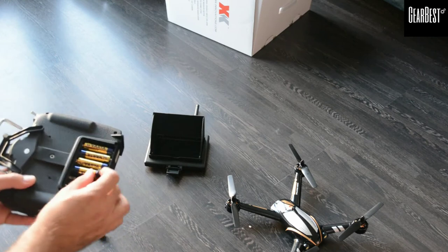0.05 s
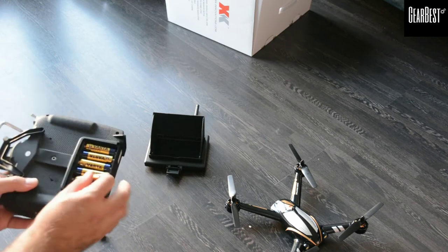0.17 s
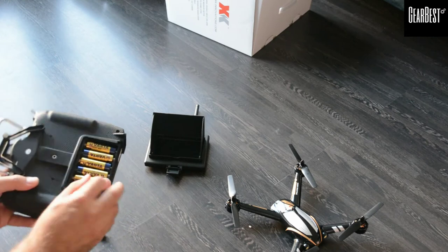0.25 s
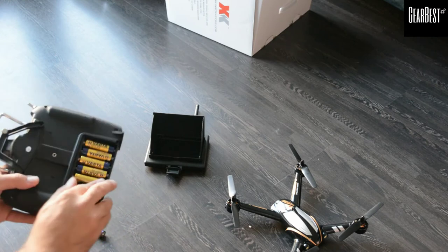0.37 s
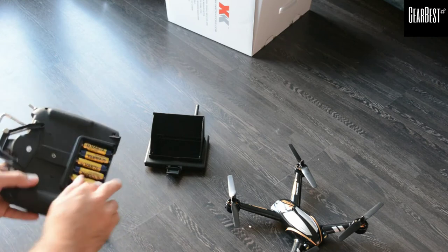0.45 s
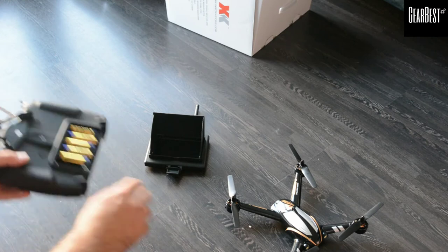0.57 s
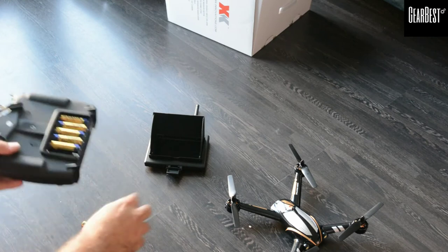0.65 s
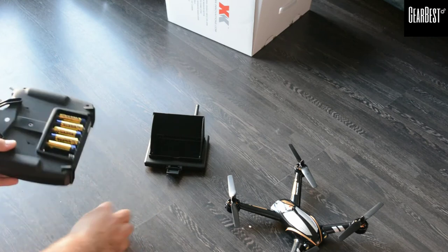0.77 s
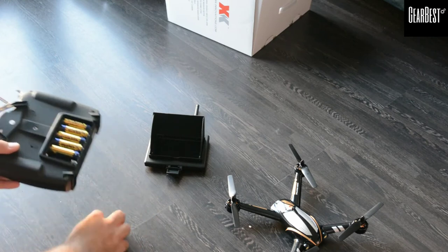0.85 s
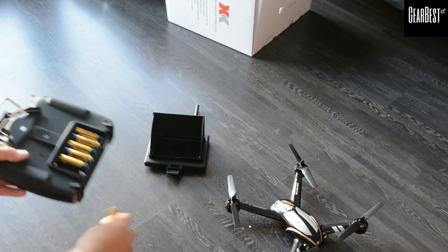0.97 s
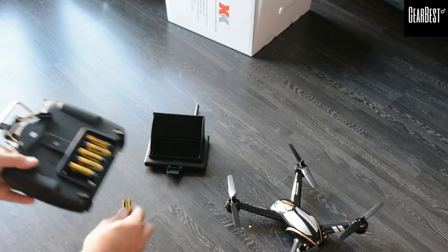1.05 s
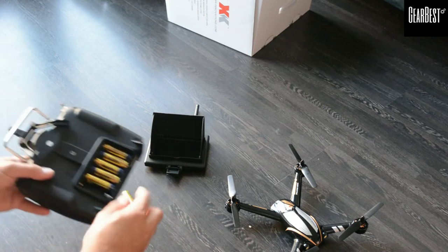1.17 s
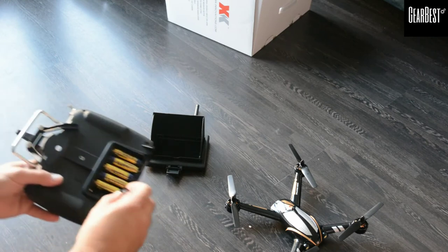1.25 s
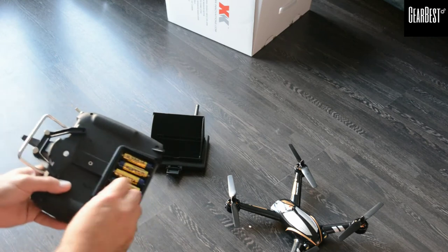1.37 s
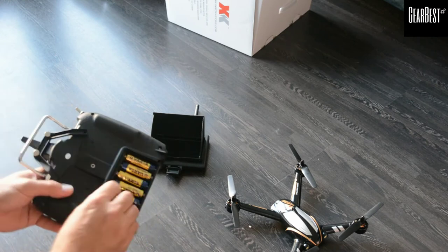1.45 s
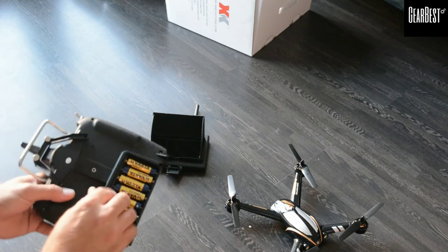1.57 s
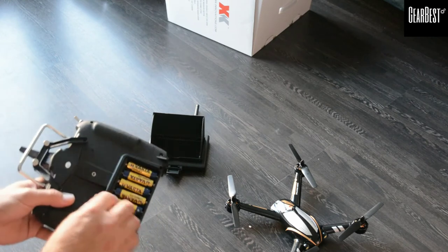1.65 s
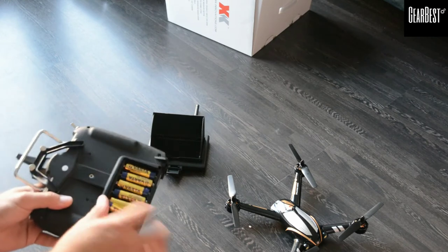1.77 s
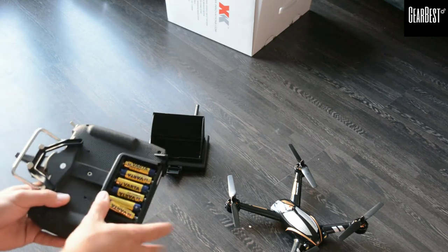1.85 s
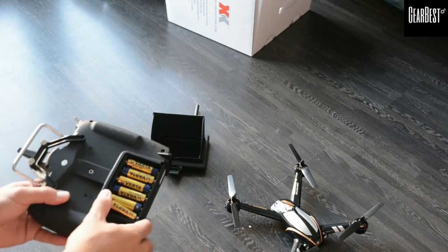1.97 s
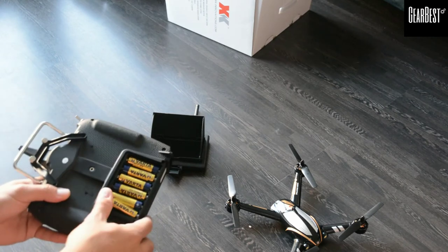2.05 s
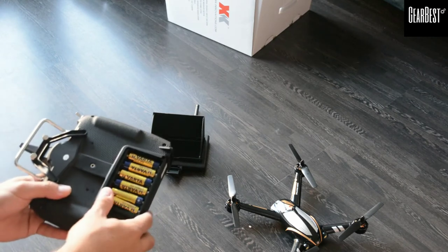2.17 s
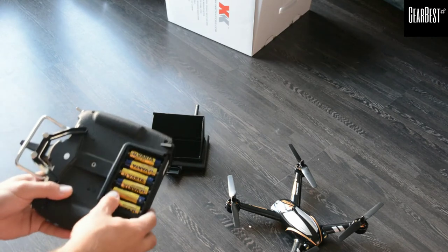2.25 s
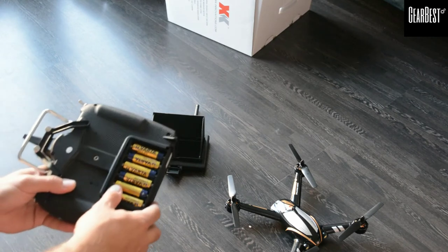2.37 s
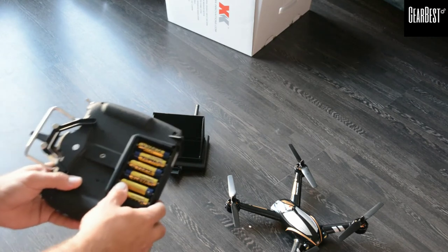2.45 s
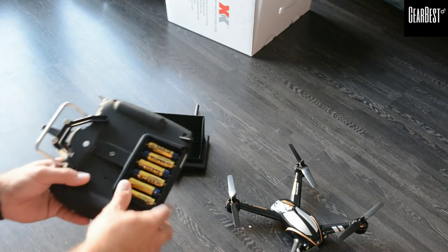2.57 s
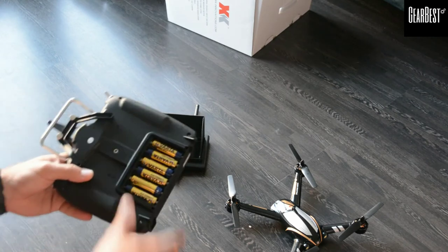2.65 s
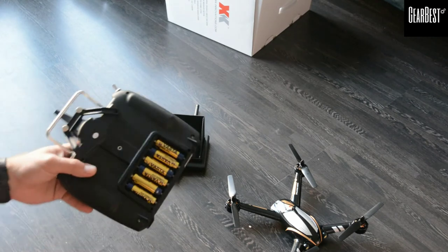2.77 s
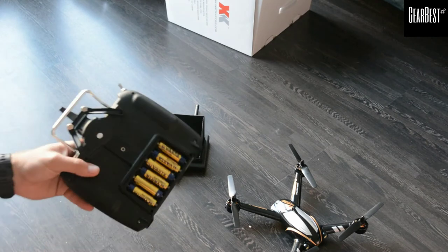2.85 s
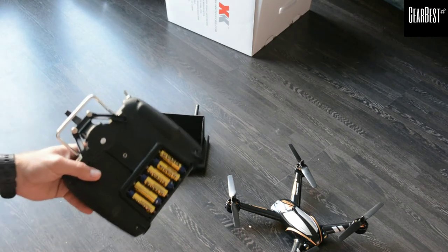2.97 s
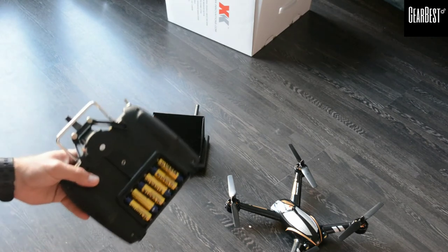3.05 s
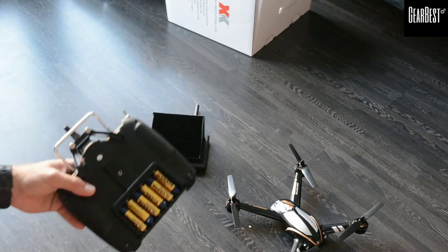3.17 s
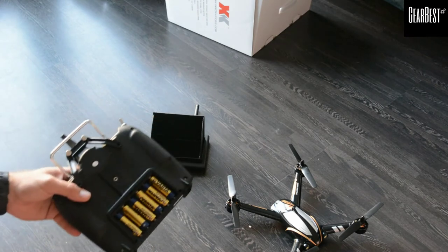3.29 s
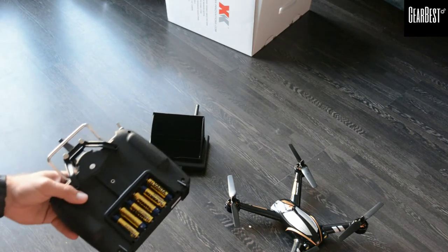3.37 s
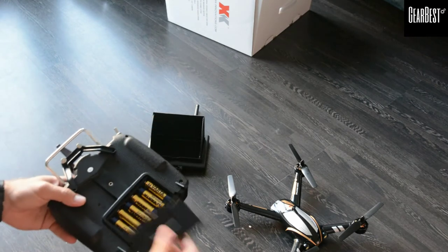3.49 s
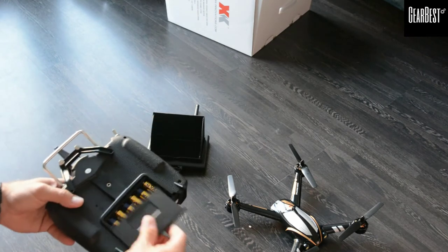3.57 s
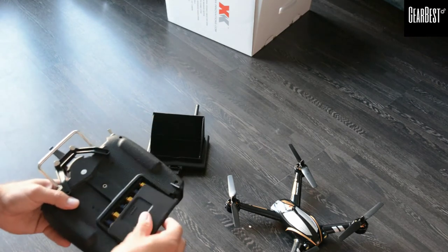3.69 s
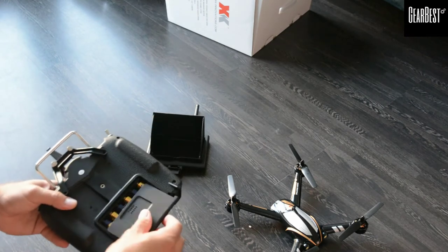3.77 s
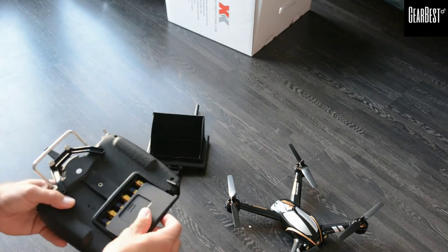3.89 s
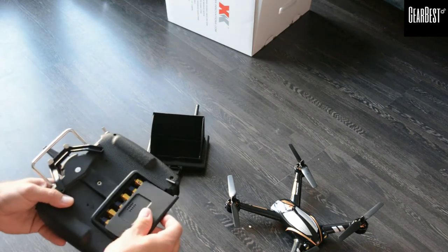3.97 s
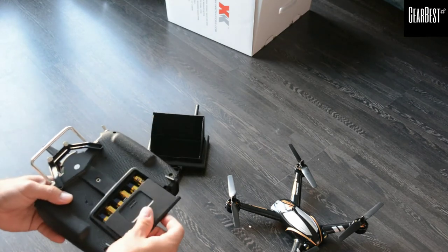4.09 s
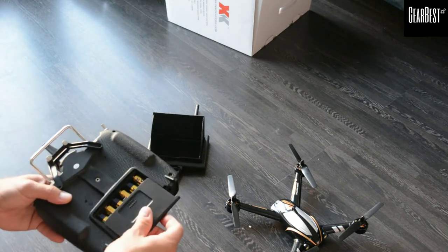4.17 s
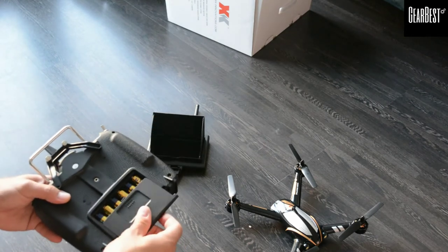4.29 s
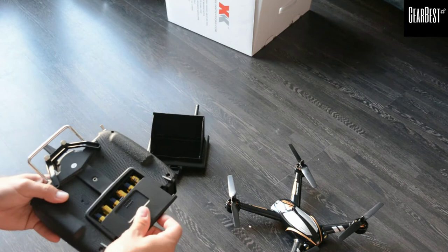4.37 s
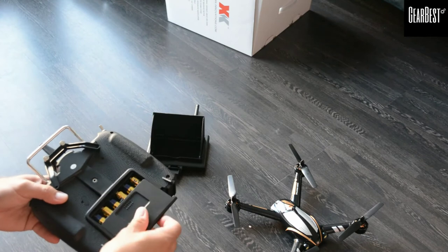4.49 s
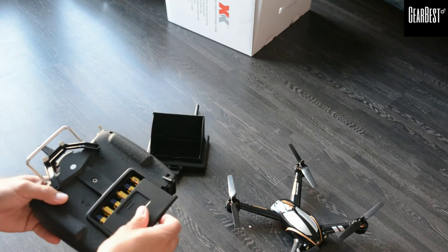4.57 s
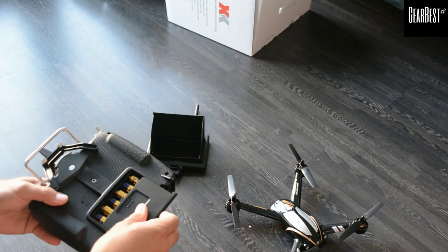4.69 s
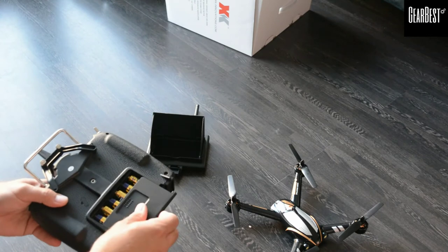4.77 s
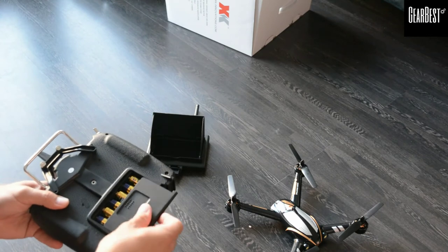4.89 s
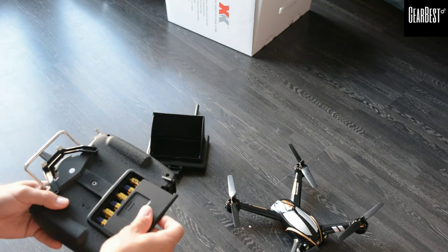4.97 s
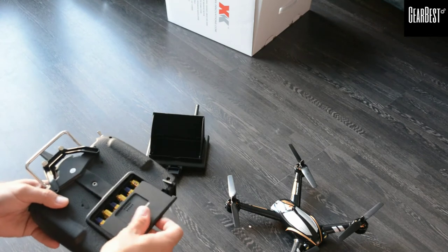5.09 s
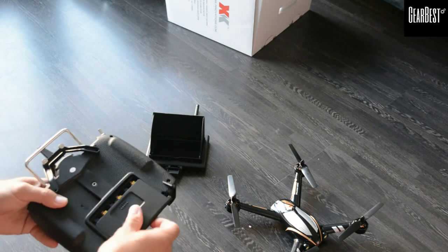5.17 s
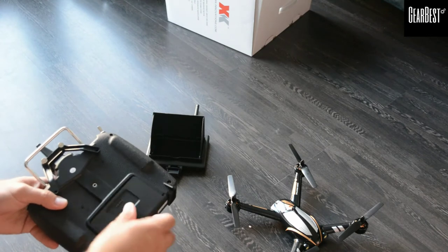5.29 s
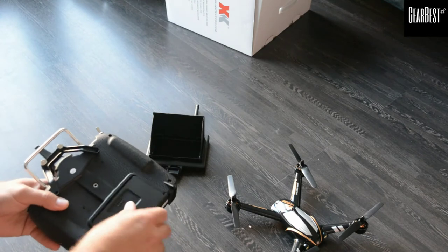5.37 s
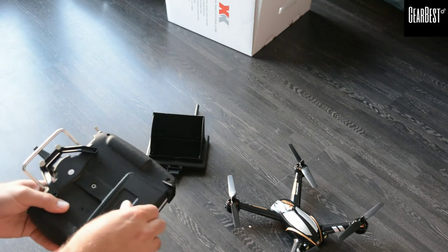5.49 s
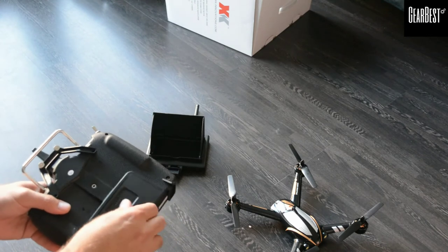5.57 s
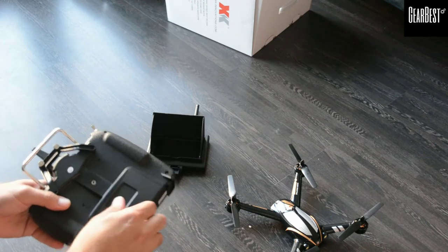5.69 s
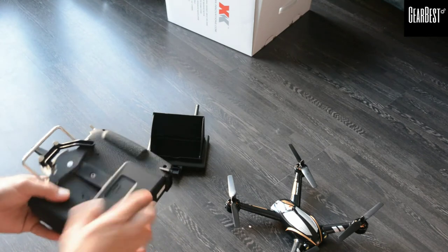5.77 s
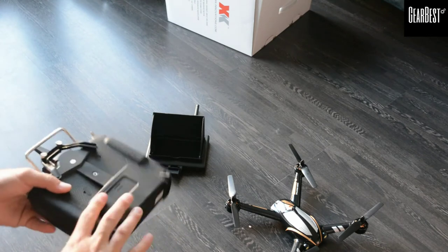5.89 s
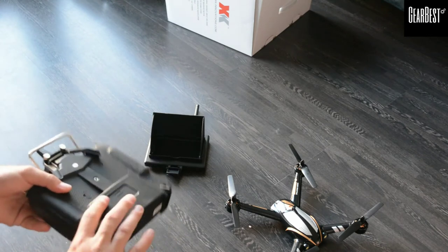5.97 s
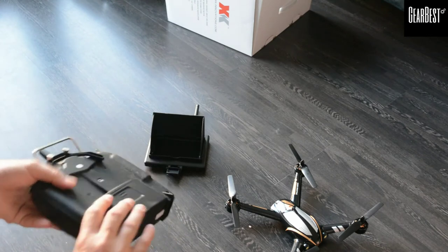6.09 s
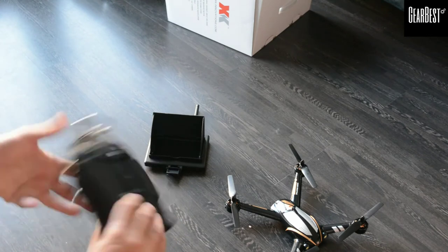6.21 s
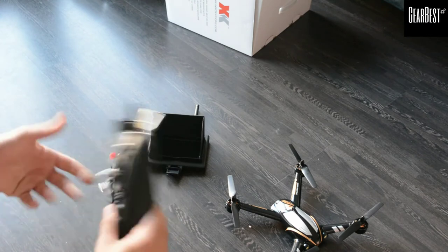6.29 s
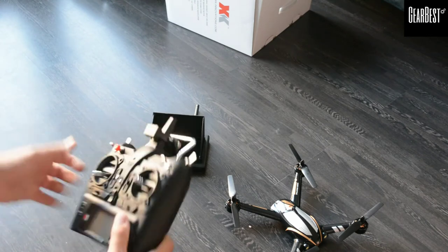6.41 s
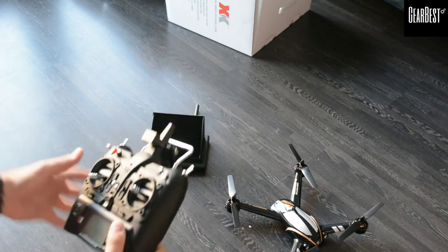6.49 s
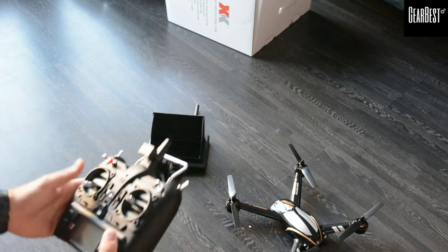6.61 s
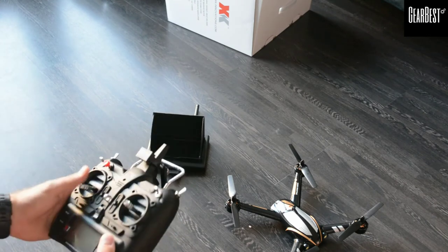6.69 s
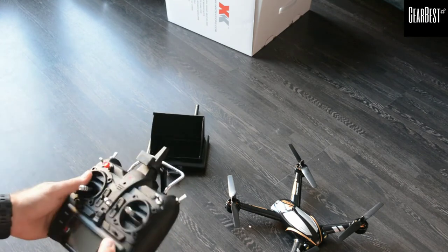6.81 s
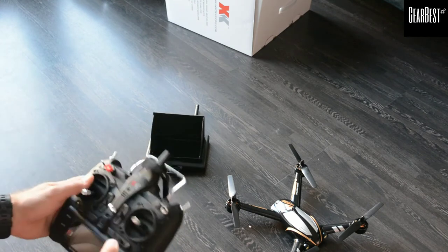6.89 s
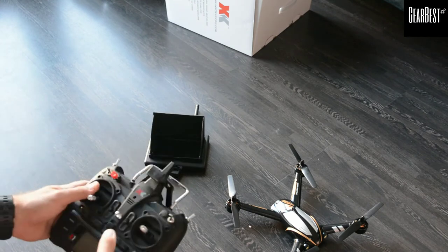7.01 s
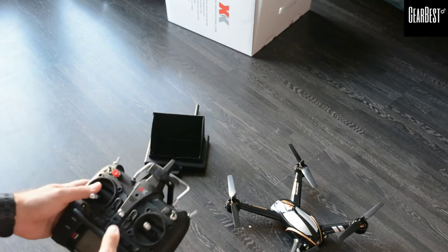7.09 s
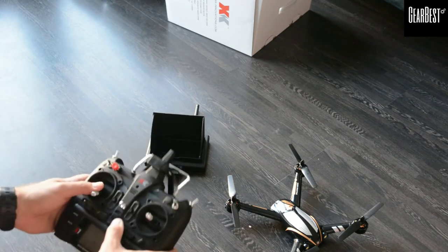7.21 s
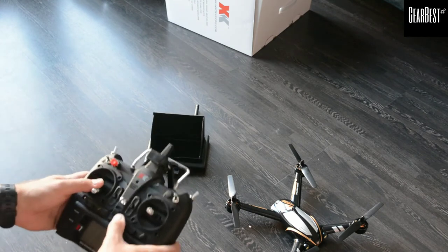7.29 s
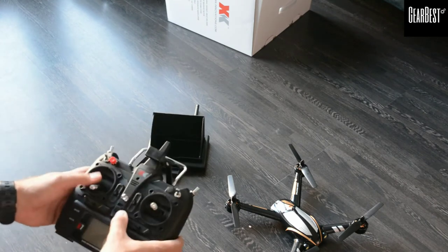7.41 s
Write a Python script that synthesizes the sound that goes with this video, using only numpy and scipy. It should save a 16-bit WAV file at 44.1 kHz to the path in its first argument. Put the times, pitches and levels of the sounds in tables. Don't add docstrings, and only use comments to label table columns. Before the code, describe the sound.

Sharp plastic snaps come in uneven bursts as cells seat against springs, the hardest ones distorting at the close stereo microphones. Then comes a brief lull, a bright clack as a cover is laid on, small scrapes and ticks, and a firm latch. Finally only faint touches and one light knock remain. The room is bare and reverberant, with a quiet steady room tone underneath.

```python
import sys
import numpy as np
from scipy import signal
from scipy.fft import rfft, irfft
from scipy.io import wavfile

SR = 44100
rng = np.random.default_rng(int(sys.argv[2]) if len(sys.argv) > 2 else 0)


def gain_from_decibels(decibels):
    exponent = np.asarray(decibels, float) / 20
    return 10 ** exponent


def transcribe(u):
    v = np.clip(np.atleast_2d(u).T, -1, 1)
    q = np.round(v * 32767).astype(np.int16)
    wavfile.write(sys.argv[1], SR, q)


N = 328525

# pitch in Hz, level in dB, time to fall 60 dB in seconds.
SHELL_MODES = [(308.6, -7, 0.043), (400, -4.5, 0.006), (490, -3, 0.014), (573.5, -2, 0.027),
               (784, -10, 0.033), (1000, 1.5, 0.016), (1169, 1, 0.021), (1350, -3.5, 0.021),
               (1560, 4.5, 0.012), (1850, -1.5, 0.012), (2125, 8, 0.0063), (2546, -5.5, 0.0094),
               (2700, 0.5, 0.0081), (3130, 13, 0.0038), (3790, -5, 0.015), (4200, 6.5, .004),
               (5076, 8, 0.0023), (6370, -3.5, 0.0031), (6670, 13.5, 0.0015), (8550, 0.5, 0.00345),
               (9660, 16, 0.0011), (11930, -8.5, 0.0036), (13950, -12, 0.00099)]
SMALL_BODY_HZ = 248


def at_hz(points, hz, axis=1):
    points = np.array(points)
    return np.interp(np.log(hz), np.log(points[:, 0]), points[:, axis])


def bands(size):
    edges_hz = 22 * 2 ** np.arange(0, 9.7, 1 / 3)
    white = rng.standard_normal((2, 2, size))
    for k, (low, high) in enumerate(zip(edges_hz, edges_hz[1:])):
        band_filter = signal.butter(2, [low, high], "band", fs=SR, output="sos")
        yield np.sqrt(low * high), signal.sosfilt(band_filter, white[k % 2])


def add(track, s, sound):
    i = round(s * SR)
    track[i:i + len(sound)] += sound[:N - i]


def air():
    # frequency in Hz, level in dB per Hz.
    air_colour = [(15, -52), (25, -28), (80, -11.5), (161, -9.5), (190, -5.5), (394, -6.5), (560, -6.5),
                  (775, -4), (1160, -9.5), (1840, -10), (16000, -38)]
    # frequency in Hz, side minus mid in dB.
    air_width = [(60, -13.5), (180, -13), (550, -6.5), (1650, -4.5), (4970, -1.5), (15000, -1.5)]
    tone = np.zeros((2, N))
    for hz, noise in bands(N):
        side_db = np.array([[0], [at_hz(air_width, hz)]])
        tone += gain_from_decibels(at_hz(air_colour, hz) + side_db) * noise
    return gain_from_decibels(-55) * tone / np.std(tone[0])


def room(x):
    # frequency in Hz, time to fall 60 dB in seconds, level in dB.
    room_tail = [(151, 0.408, -52), (400, 0.58, -29.5), (1040, 0.65, -32.5), (2700, 0.65, -31),
                 (7500, 0.54, -26), (14340, .3, -31.5)]
    # frequency in Hz, side minus mid in dB.
    tail_width = [(60, -26), (150, -21), (380, -40), (950, -32.5), (2380, -18), (5980, -14), (15000, -2.5)]
    direct_db, floor_echo_s, floor_echo_db = 2.5, 0.0055, -8
    early_db, early_t60_s = 5.5, 0.068
    t = np.arange(SR) / SR
    swell = 1 - np.exp(-np.clip(t - .003, 0, 1) / 0.0034)
    reply = np.zeros((2, SR))
    for hz, noise in bands(SR):
        side_db = np.array([[0], [at_hz(tail_width, hz)]])
        gains = gain_from_decibels(at_hz(room_tail, hz, axis=2) + side_db)
        late_fade = gain_from_decibels(-60 * t / at_hz(room_tail, hz))
        early_fade = gain_from_decibels(early_db - 60 * t / early_t60_s)
        reply += gains * noise * swell * (late_fade + early_fade)
    early = np.zeros(SR)
    early[[0, round(floor_echo_s * SR)]] = gain_from_decibels([direct_db, floor_echo_db])
    reply[0] += early
    reply[1] += gain_from_decibels(-10.5) * signal.lfilter(*signal.butter(1, 9000, "high", fs=SR), early)
    return signal.fftconvolve(x[None], reply, axes=1)[:, :N]


def damped(hz, t60):
    t = np.arange(SR // 12) / SR
    fade = gain_from_decibels(-60 * np.outer(1 / np.array(t60), t))
    return np.sin(2 * np.pi * np.outer(hz, t)) * fade


def shell_ring(colour_hz, levels_db, luck, size=4096):
    hz, mode_db, t60 = np.transpose(SHELL_MODES)
    colour_db = np.interp(np.log(hz), np.log(colour_hz), levels_db)
    spread_db = 3.5
    modes = gain_from_decibels(colour_db + mode_db + spread_db * luck)[:, None] * damped(hz, t60)
    power = np.sum(np.abs(rfft(modes, size)) ** 2, axis=0)
    cepstrum = irfft(np.log(power + 1e-12) / 2)
    cepstrum[1:size // 2] *= 2
    cepstrum[size // 2 + 1:] = 0
    return irfft(np.exp(rfft(cepstrum)))[:size // 2]


def chatter(blow):
    for delay_s in (.00017, .00045, .0011):
        lag = round(delay_s * rng.uniform(.6, 1.4) * SR)
        taps = np.zeros(lag + 1)
        taps[[0, lag]] = .68, 1
        blow = signal.lfilter(taps, taps[::-1], blow)
    return blow


def rattles(count=40):
    # start in seconds, shell level in dB, length in seconds, boom and tick in dB against the shell.
    rubs = [(0.061, -11.5, 0.04, 1, -30), (0.145, -16, 0.01, 0.5, -21.5), (0.200, -27, 0.022, -22, -41),
            (0.853, -28.5, 0.017, 9, -31), (1.389, -9, 0.027, 0.5, -23), (3.200, -32.5, 0.15, 4.5, -7),
            (4.018, -32, 0.04, -18, -46), (4.944, -49.5, 0.048, 3, -4), (5.069, -34.5, .04, -9, -21.5),
            (5.642, -40, 0.1, -10.5, -29), (5.718, -40, 0.04, -21, -21), (5.975, -42, 0.034, -12, -47),
            (6.105, -41.5, 0.21, 4, -10.5), (6.575, -51, 0.067, -10, -5), (7.294, -52.5, 0.1, -1.5, -7.5)]
    clack_db = -8.5
    out = np.zeros(N)
    for s, db, length, boom, tick in rubs:
        spot = rng.random(count)
        blows = np.zeros(int(length * SR) + 2)
        places = (spot * len(blows)).astype(int)
        blows[places] = rng.standard_normal(count) * np.sqrt(np.sin(np.pi * spot))
        spectrum = rfft(blows)
        blows = 2 * irfft(spectrum / np.sqrt(np.abs(spectrum) + 1e-9))
        levels_db = db - 16.5 + np.array([boom, 0, clack_db, tick])
        ring = shell_ring([430, 1100, 2600, 7500], levels_db, rng.standard_normal(len(SHELL_MODES)))
        add(out, s, signal.fftconvolve(blows, ring))
    return out


def rings():
    # start in seconds, level in dB, pitch in Hz.
    cell_notes = [(0.049, -33, 424), (0.050, -28, 3200), (0.063, -17, 1140), (0.074, -14.5, 477),
                  (0.146, -3.5, 1124), (0.186, -3, 1088), (0.212, -16, 1160), (0.304, -11, 2700),
                  (0.492, -19.5, 3780), (0.817, -44, 330), (0.871, -37, 1150), (1.379, -20.5, 980),
                  (1.379, -26, 416), (1.550, -17.5, 948), (1.572, -5, 1054), (1.683, -12.5, 987),
                  (1.909, -20, 2200), (1.909, -21, 3440), (1.91, -9, 1525), (1.912, -12, 1040),
                  (1.975, -9, 1030), (2.198, 0.5, 1576), (2.2, -17, 1080), (2.206, -5, 1180)]
    # start in seconds, level in dB, pitch in Hz.
    lid_notes = [(3.197, -36, 3970), (3.272, -31, 733), (3.292, -42, 760), (3.548, -13, 1520),
                 (3.548, -15, 2980), (3.561, -22, 3020), (3.582, -23, 2880), (3.593, -0.5, 2636),
                 (3.596, -6.5, 2420), (3.597, -29, 3080), (4.057, -22.5, 1886), (4.058, -22, 3010),
                 (4.06, -25, 1310), (4.287, -9.5, 2256), (4.287, -9.5, 2730), (4.288, -25, 3400),
                 (4.288, -24, 4300), (4.859, -30, 1350), (4.940, -26, 1870), (4.960, -50, 8700),
                 (4.985, -36, 4770), (5.005, -40, 4870), (5.092, -38, 915), (5.126, -33, 970),
                 (5.146, -23, 2040), (5.278, -7.5, 1850), (5.278, -10.5, 1070), (5.278, -15, 4200),
                 (5.411, -14, 1264), (5.412, -9, 2250)]
    # start in seconds, level in dB, pitch in Hz.
    fitting_notes = [
        (5.870, -45, 167.5),
        (5.99, -38.5, 980),
        (6.107, -47, 1100),
        (6.195, -43, 12800),
        (6.198, -32, 2700),
        (6.207, -40, 1090),
        (6.340, -45, 2930),
        (6.737, -23.5, 1380),
        (6.735, -26, 1620),
    ]
    # start in seconds, level in dB, pitch in Hz.
    knocks = [(0.810, -27.5, 313), (1.392, -14.5, 760), (1.682, -13, 2900), (1.908, -10.5, 980),
              (1.912, -7, 1500), (2.195, -11, 913), (2.204, -4, 1230), (3.6, -37, 706), (3.198, -19.5, 700),
              (3.199, -24, 2500), (3.593, -5, 3935), (5.279, -21, 616), (5.412, 1, 1980),
              (5.414, -16, 1500), (6.736, -25.5, 720), (6.1, -30, 1230)]
    rise_s = 0.00045
    out = np.zeros(N)
    for notes, cycles in ((cell_notes, 24.5), (lid_notes, 25), (fitting_notes, 25), (knocks, 12)):
        for s, db, hz in notes:
            mode = damped([hz], [cycles / hz])[0]
            swell = (1 - np.exp(-np.arange(len(mode)) / SR / rise_s)) ** 2
            add(out, s, gain_from_decibels(db) * mode * swell)
    return out


def snaps():
    # start in seconds, shell level in dB,
    # then boom, hardness and tick in dB against the shell.
    cell_snaps = [(0.059, -14.5, -3, -7, -23.5), (0.186, -8.5, -9.5, -10.5, -29.5),
                  (0.205, -13.5, -5.5, -11, -33), (0.304, -11, -1.5, -3, -26),
                  (0.312, -14.5, -4.5, -13, -46), (0.492, -43, 7, 12.5, -15), (0.871, -25.5, -24, -2, -38),
                  (1.55, -23.5, -11.5, -13.5, -34), (1.57, -3, -14.5, -11.5, -33),
                  (1.68, -15, -12, -4, -29.5), (1.908, -2.5, -14.5, -11.5, -28),
                  (1.952, -19, -37, -30.5, -42), (2.071, -21.5, 0, -8, -32),
                  (2.1975, -2.3, -10.5, -8.5, -24), (2.204, -5.5, 2, -12.5, -40.5)]
    # start in seconds, shell level in dB,
    # then boom, hardness and tick in dB against the shell.
    lid_snaps = [(3.184, -36.5, -4, -1.5, -33), (3.195, -37.5, 12.5, 8.5, -0.5), (3.549, -18, -29, -4, -27),
                 (3.582, -22, -19, -2, -33), (3.592, -15.5, -19, 1.5, -8.5), (4.027, -52, -6, -1, -30),
                 (4.057, -25, -38, -2, -40), (4.185, -35, -35, -21, -40), (4.286, -25, -26, 0.5, -7.5),
                 (4.396, -40.5, -7, 2.5, -30), (4.858, -39, -44, -4.5, -33), (4.939, -42.5, 5.5, -0.5, -37),
                 (5.125, -36, -7, 1, -41), (5.145, -36, 3, -6, -27), (5.258, -28, -22, -11, -32),
                 (5.277, -18.5, -32, -6.5, -21), (5.410, -11, -10.5, -10, -23)]
    # start in seconds, shell level in dB,
    # then boom, hardness and tick in dB against the shell.
    grip_taps = [
        (5.862, -46.5, -21, -1.5, -40),
        (6.105, -44.5, -13, -7, -17),
        (6.206, -28, -8, -7.5, -28.5),
        (6.735, -22, -24, -9, -28.5),
        (7.185, -45, -1, -1.5, -42),
        (7.314, -55, -7, 1, -32),
    ]
    out = np.zeros(N)
    for blows, click_lift in ((cell_snaps, 0.5), (lid_snaps, 3), (grip_taps, 2)):
        for s, db, boom, hardness, tick in blows:
            click = click_lift + 0.84 * hardness + 0.39 * tick
            levels_db = db - 2.5 + np.array([boom, 0, hardness, click, tick])
            luck = rng.standard_normal(len(SHELL_MODES))
            blow = shell_ring([430, 1100, 2250, 4000, 8000], levels_db, luck)
            patch_hz = SMALL_BODY_HZ * gain_from_decibels(-0.17 * boom)
            blow = signal.lfilter(*signal.butter(2, patch_hz, "high", fs=SR), blow)
            add(out, s, chatter(blow))
    return out


def scene():
    housing = rattles() + rings() + snaps()
    housing = signal.sosfilt(signal.butter(4, SMALL_BODY_HZ, "high", fs=SR, output="sos"), housing)
    housing = signal.sosfilt(signal.butter(2, 13600, fs=SR, output="sos"), housing)
    mid, side = room(housing) + air()
    return np.array([mid + side, mid - side])


def roll_off(x):
    return signal.sosfilt(signal.butter(12, 16220, fs=SR, output="sos"), x)


def record(dry):
    overload = .96
    clipped = np.clip(dry, -overload, overload)
    excess = np.abs(dry - clipped).mean(axis=0)
    kick = gain_from_decibels(-11) * signal.lfilter(*signal.butter(1, 194, fs=SR), excess)
    clipped = np.clip(clipped - kick, -overload, overload)
    mix = signal.sosfilt(signal.cheby2(10, 60, 16100, fs=SR, output="sos"), clipped)
    return roll_off(mix)


dry = scene()
out = record(dry)
transcribe(out)
```